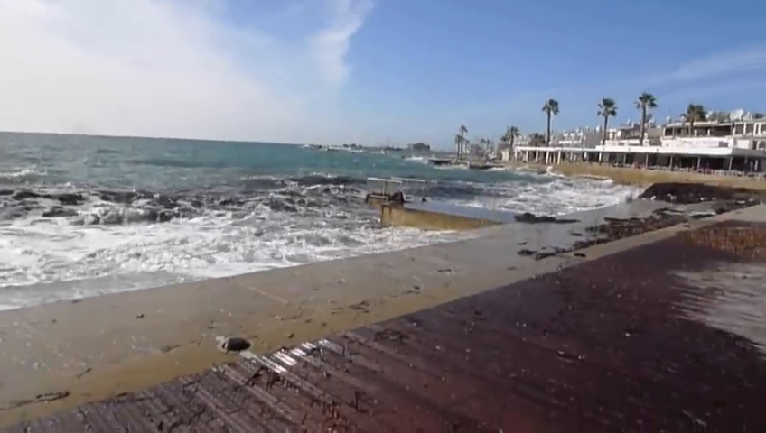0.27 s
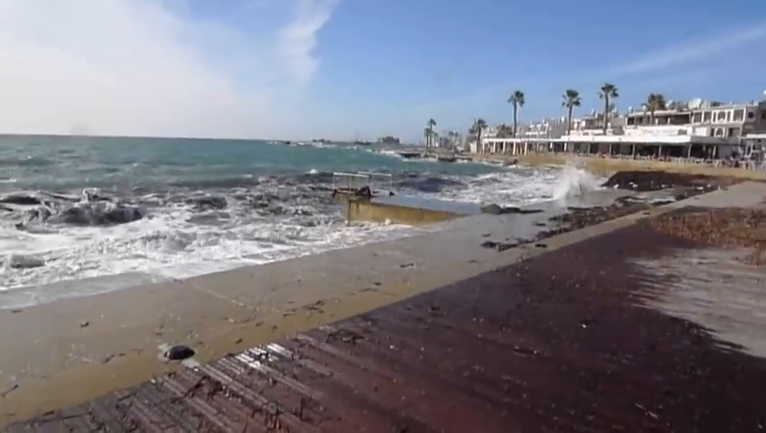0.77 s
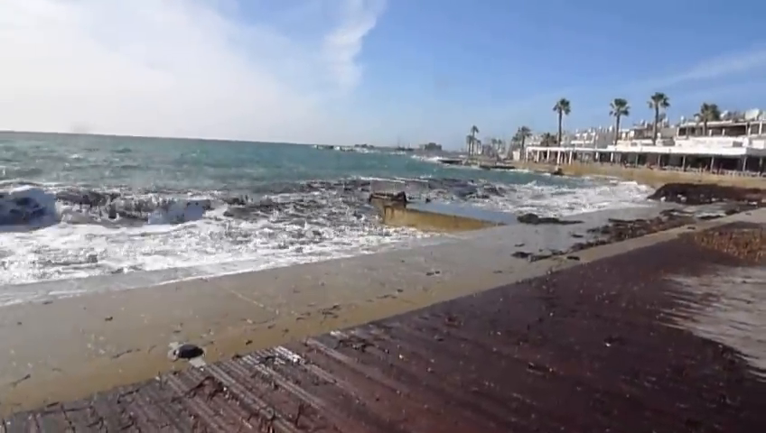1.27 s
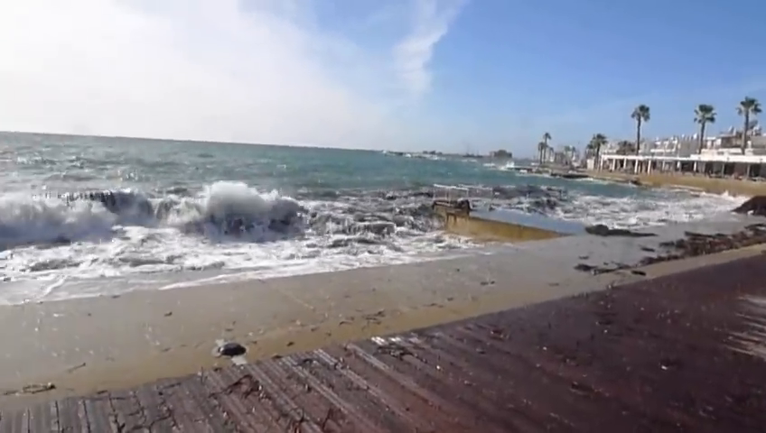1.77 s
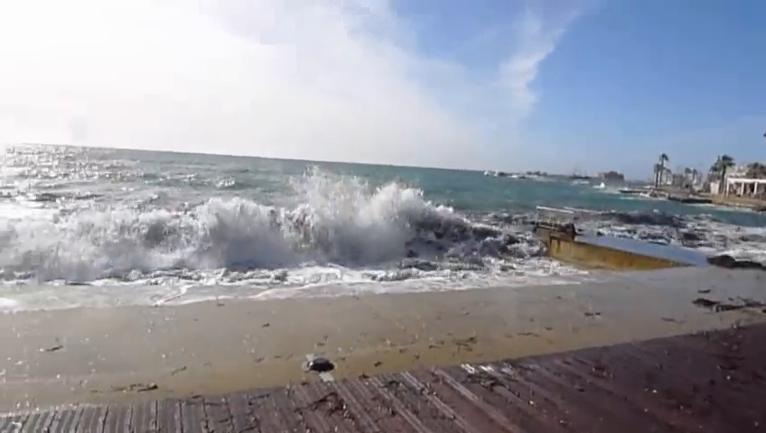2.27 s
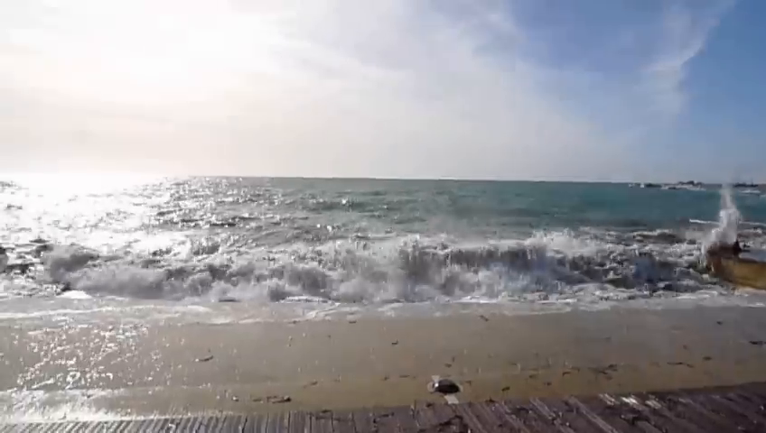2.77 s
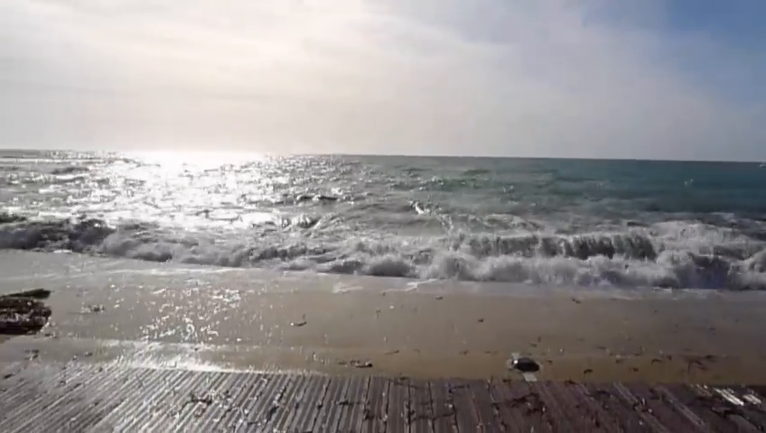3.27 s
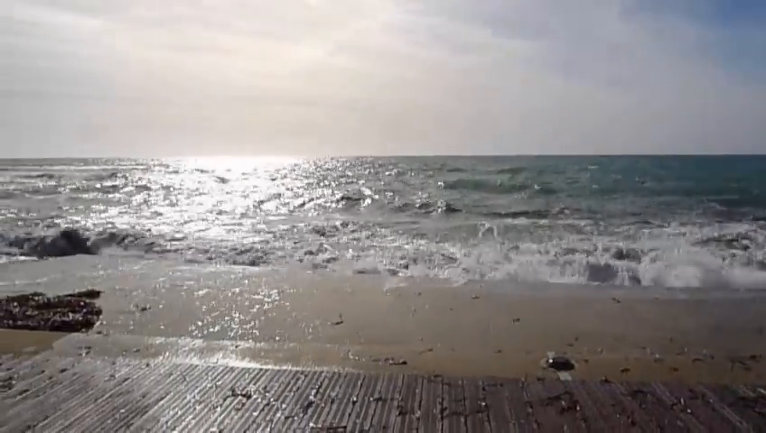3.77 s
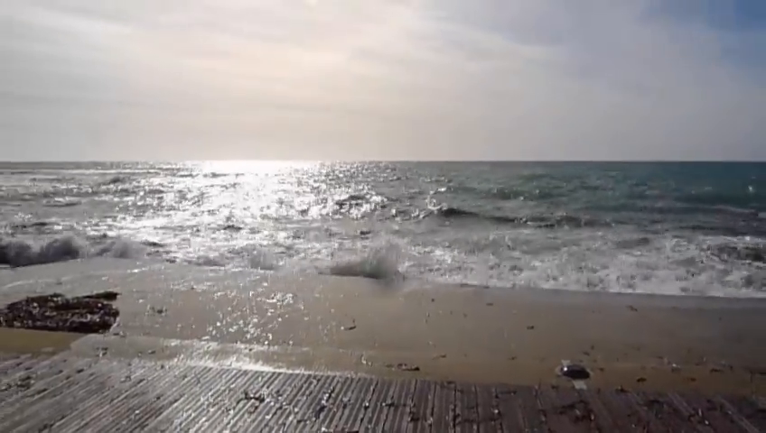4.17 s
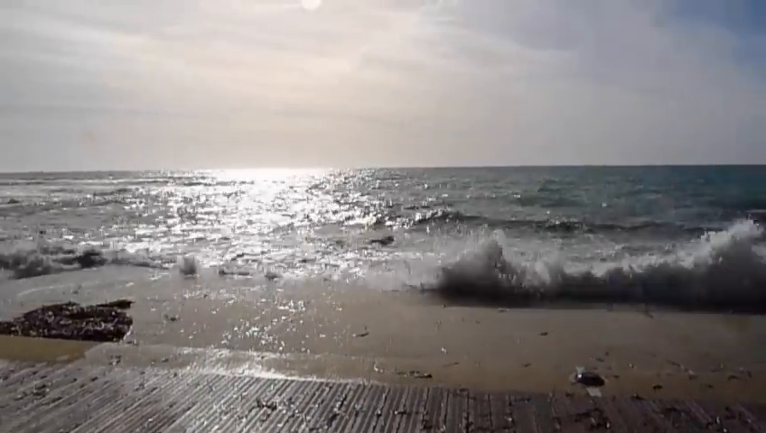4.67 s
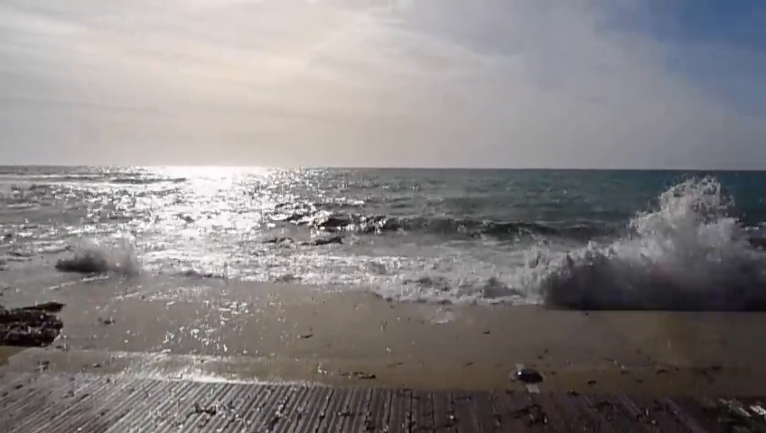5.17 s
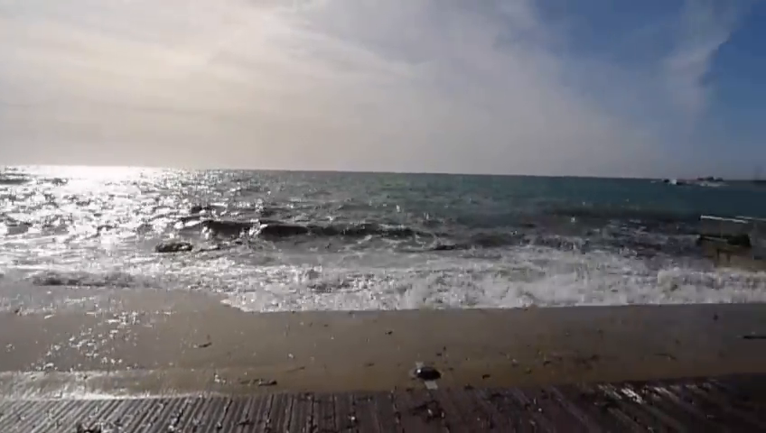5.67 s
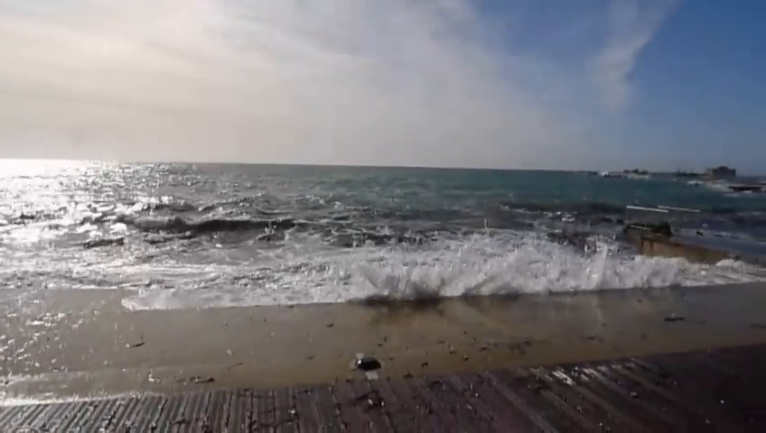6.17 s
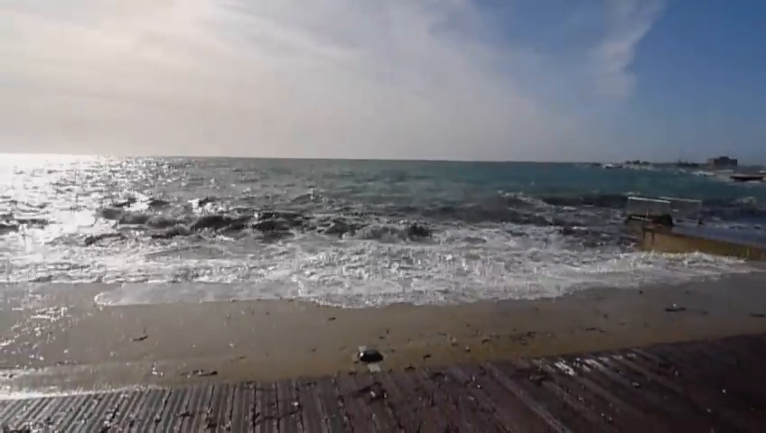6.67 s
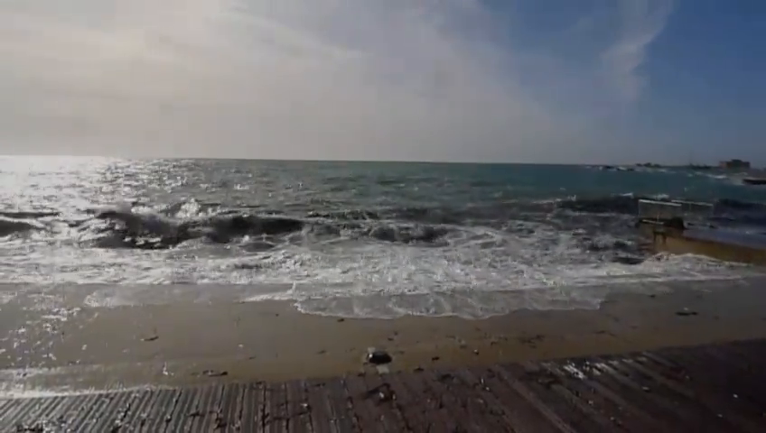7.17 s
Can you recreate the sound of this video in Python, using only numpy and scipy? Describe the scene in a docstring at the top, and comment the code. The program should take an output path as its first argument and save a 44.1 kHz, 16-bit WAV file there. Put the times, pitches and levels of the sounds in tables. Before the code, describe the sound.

Mono, slightly muffled sound from a small camera microphone on a windy concrete shore. At 0 s wind dominates: low fluttering rumble, irregular thuds and blunt pops, with the surf still faint behind. The roar of side breakers builds up to about 1.7 s, slapping at 0.5, 1.3 and 1.6 s. Hard gusts hit near 0.95, 1.3 and 1.7 s, then dense popping and flutter run to 2.6 s. Around 3 s the wind briefly smooths out and the surf is clearer; another cluster of pops batters from 3.3 to 3.9 s. From 4.2 s close wash and foam fizz come forward, with slaps near 4.9 and 5.3 s. Wind is steadier, with low heaves around 5.4 to 5.7 s. A splashy, crackling burst comes at 6.2 to 6.6 s, a short rattle of wind pops at 6.8 s, more thumps at 7.1 s, then receding wash and tiny rising bubble blips at 7.3 s.

```python
"""Concrete shore in strong wind: rough surf heard by a small camera microphone.
Side breakers and front wash are shaped noise, each combed by its echo off the wet slab.
Foam and lone bubbles are short rising rings. Gusts buffet the microphone port:
lumpy filtered noise for flutter, thud and rasp, single damped swings for pops and shoves."""
import sys
import numpy as np
from scipy import signal
from scipy.fft import rfft, irfft, next_fast_len
from scipy.io import wavfile
from scipy.ndimage import uniform_filter1d

SR = 44100
rng = np.random.default_rng(int(sys.argv[2]) if len(sys.argv) > 2 else 0)


def master(y):
    """Save y as 16-bit WAV."""
    cut = np.clip(np.atleast_2d(y).T, -1, 1)
    pcm = np.round(cut * 32767)  # scale
    wavfile.write(sys.argv[1], SR, pcm.astype(np.int16))


def volts_from_db(level):
    """Convert decibel levels to linear amplitude ratios."""
    exponent = np.asarray(level, float) / 20
    return 10 ** exponent


N = 327037

# run of the waves: t/s, roar level/dB, spray hiss over roar/dB, front wash against side breakers/0-1
SURF = [(0, -36, -5.5, 0.66), (.5, -31.5, -6.5, 0.28), (.9, -28, -7, 0.4), (1.3, -26.5, -6.5, 0.4),
        (1.65, -23.5, -7.5, 0.2), (1.95, -29, -5.5, 0.2), (2.12, -29, -4, .2), (2.3, -25.5, -5, 0.26),
        (2.55, -29, -4, 0.5), (2.7, -30, -3.5, 0.8), (2.95, -29, -4, 0.65), (3.25, -25.5, -6, 0.55),
        (3.55, -25.5, -5, 0.88), (3.85, -27.5, -6.5, 0.5), (4.05, -28.5, -6, 0.65), (4.22, -27, -6, 0.6),
        (4.4, -25, -6.5, 0.8), (4.75, -26, -4, 0.63), (5.1, -25.5, -3.5, 0.92), (5.5, -27.5, -5.5, 0.93),
        (6.1, -29.5, -5, 0.44), (6.33, -24.5, -6, 0.95), (6.46, -27, -4.5, 0.7), (6.6, -26, -4.5, 0.8),
        (7.15, -30.5, -6, 0.5), (7.42, -27.5, -6.5, 0.66)]
# wind pops, membrane sucked out: t of trough/s, nominal depth/dB, f/Hz
POPS = [(0.102, -9, 220), (0.236, -11, 243), (0.27, -10.5, 173), (0.511, -9, 173), (0.614, -10.5, 178),
        (0.626, -7.5, 129), (0.754, -15, 117), (0.944, -14, 224), (1.039, -9, 139), (1.262, -8.5, 191),
        (1.307, -11, 157), (1.388, -12, 141), (1.675, -9.5, 268), (1.706, -13.5, 121), (1.731, -10, 158),
        (1.805, -10, 232), (1.836, -6, 279), (1.92, -7.5, 290), (1.933, -6, 348), (1.955, -16, 107),
        (1.998, -16, 147), (2.017, -9, 202), (2.039, -5, 230), (2.124, -5.5, 286), (2.168, -6.5, 237),
        (2.258, -9, 259), (2.334, -6, 247), (2.388, -6.5, 190), (2.446, -12, 265), (2.475, -7, 236),
        (2.567, -9, 222), (2.593, -5.5, 231), (2.645, -14, 340), (3.255, -13, 200), (3.324, -7, 182),
        (3.343, -11.5, 245), (3.424, -12, 237), (3.541, -12, 279), (3.551, -7, 282), (3.563, -14, 324),
        (3.64, -8, 250), (3.698, -8, 250), (3.773, -5, 280), (3.794, -11, 237), (3.814, -14, 218),
        (3.835, -4.5, 253), (3.875, -12, 210), (4.447, -16, 272), (5.018, -14, 150), (5.287, -9, 225),
        (6.816, -10, 150), (6.826, -14, 150), (6.835, -10, 153), (6.844, -11, 132), (7.096, -13, 282),
        (7.114, -18, 147), (7.157, -19, 168), (7.408, -16, 158)]
# wind shoves, the other way: t of crest/s, nominal height/dB, f/Hz
SHOVES = [(.189, -10, 219), (.259, -11, 237), (.835, -10.5, 123), (0.943, -12, 315), (1.076, -8.5, 198),
          (1.135, -14, 262), (1.293, -12, 218), (1.302, -8, 221), (1.364, -9, 148), (1.425, -10.5, 150),
          (1.546, -12, 212), (1.694, -6, 306), (1.853, -7.5, 282), (1.895, -8.5, 315), (2.1, -10, 227),
          (2.254, -12, 262), (2.402, -11, 250), (2.418, -7, 190), (2.465, -9, 232), (3.577, -7, 222),
          (3.613, -6, 182), (3.622, -7, 246), (4.198, -11.5, 294), (4.87, -13, 163), (5.0, -9, 284),
          (5.269, -12, 195), (5.794, -12, 253), (6.028, -16, 240), (6.245, -12, 196), (6.846, -10.5, 152),
          (7.061, -15, 250), (7.116, -11.5, 202), (7.345, -13, 286)]


def evened(x):
    """Scales to rms 1."""
    return x / np.sqrt(np.mean(x ** 2) + 1e-20)


def read(points, hz):
    """Interpolates a spectrum table on a log frequency axis."""
    f, value = np.transpose(points)
    return np.interp(np.log(hz + 1), np.log(f + 1), value)


def columns(rows, t):
    """Interpolates every column of a time table at t."""
    s, *values = np.transpose(rows)
    return [np.interp(t, s, v) for v in values]


def coloured(x, points):
    """Filters by a spectrum table, zero phase."""
    size = next_fast_len(len(x))
    gain = volts_from_db(read(points, np.fft.rfftfreq(size, 1 / SR)))
    return irfft(rfft(x, size) * gain, size)[:len(x)]


def wander(seconds):
    """Smooth noise of rms 1 that changes over the given time."""
    size = max(round(seconds * SR), 2)
    once = uniform_filter1d(rng.standard_normal(N), size)
    return evened(uniform_filter1d(once, size))


def bumps(rows, t, fall_s):
    """Sum of bells in dB, each with its own rise time and a shared fall time."""
    return sum(db * np.exp(-((t - s) / np.where(t < s, rise_s, fall_s)) ** 2) for s, rise_s, db in rows)


def level_dips(t):
    """Surf loss in dB: the level drops quickly at listed times and recovers slowly."""
    # t/s, nominal depth/dB
    dips = [(0, 0.5), (.935, 6.5), (1.28, 3.5), (1.685, 6.5), (2.045, 5), (2.6, 3.5), (3.345, 1.5),
            (3.6, 3), (5.305, 0.5), (6.83, 1.5)]
    fall_s, return_s = 0.016, 0.48
    loss_db = 0
    for s, db in dips:
        since_s = np.maximum(t - s, 0)
        loss_db = loss_db + db * (1 - np.exp(-since_s / fall_s)) * np.exp(-since_s / return_s)
    return loss_db


def slab_comb(hz, delay_ms, strength, rough_hz):
    """Power response of direct sound plus slab echo; the rough slab scatters the echo's treble."""
    echo = (strength / (1 + (hz / rough_hz) ** 6))[:, None]
    return abs(1 + echo * np.exp(-2j * np.pi * hz[:, None] * delay_ms / 1e3)) ** 2


def surf():
    """Countless bursting bubbles: noise in drifting patches, combed by the slab echo."""
    # colour of the roar: f/Hz, spectral density/dB
    surf_colour = [(60, -32), (150, -12), (300, 4.5), (560, -6), (750, 0.66), (930, 1), (1200, -2.5),
                   (1550, -3), (2000, -4), (2500, -1.5), (3000, -3), (3400, -3), (3800, -9.5), (4300, -19),
                   (4800, -27), (5500, -31), (8000, -76)]
    # slaps of water: t of crest/s, level added to roar/dB, spray added/dB
    slaps = [(.52, 5.5, -2.5), (1.265, 3, -2.5), (1.545, 4, -4.5), (1.67, 2.5, 0), (2.33, -0.5, 0),
             (3.324, 2, 3), (4.24, 1, -0.5), (4.85, -1, 1.5), (5.14, -2, 4), (5.289, 6.5, -4),
             (6.21, -2, 6), (6.3, 0, 4), (6.335, 0.5, .1), (6.356, 2, 2), (6.372, 4.5, -3), (6.43, 2, 0),
             (6.455, 2.5, -1), (6.485, 6, -3.5), (6.52, 2, -0.5), (6.56, 1.5, 1.5), (7.29, 0.5, -.6)]
    # the breaking point moves along the shore: t/s, side echo delay as a share of its usual value
    side_reach = [(0, 1.01), (1.6, 1), (1.8, 1.03), (2.4, 1.03), (2.9, 1.06), (4, 1.01), (7.42, 1.04)]
    slap_rise_s, slap_fall_s = 0.021, 0.0053
    front_dull_hz = 4600  # the wet wash in front fades above this
    frames, hz = N // 128 + 5, np.fft.rfftfreq(512, 1 / SR)
    t = (np.arange(frames) * 128 / SR)[None]

    roar_db, bright_db, front = columns(SURF, t)
    front = np.clip(front, 0, 1)
    roar_db = roar_db - level_dips(t) + bumps([(s, slap_rise_s, db) for s, db, _ in slaps], t, slap_fall_s)
    bright_db = bright_db + bumps([(s, slap_rise_s, db) for s, _, db in slaps], t, slap_fall_s)

    real, imag, patches = rng.standard_normal((frames, 257, 3)).T
    patches = evened(uniform_filter1d(uniform_filter1d(patches, 6, 0), 20, 1))
    splashes = evened(uniform_filter1d(rng.standard_normal(frames), 8))  # land in all bands at once

    reach, = columns(side_reach, t)
    side = slab_comb(hz, 0.63 * reach, 0.75, 3300)
    near = slab_comb(hz, 1.34, 0.5, 3040) / (1 + (hz[:, None] / front_dull_hz) ** 6)
    shape = np.sqrt((1 - front) * side + front * near)
    shape = shape * volts_from_db(read(surf_colour, hz)[:, None])
    body = (hz > 650) & (hz < 1800)  # band that sets the level
    shape = shape / np.sqrt((shape[body] ** 2).sum(0))

    spray = np.clip(np.log((hz[:, None] + 1) / 1100) / np.log(2.6), 0, 1.4)  # takes over in the treble
    level_db = roar_db + spray * bright_db + 0.41 * patches + 0.41 * splashes
    z = (real + 1j * imag) * shape * volts_from_db(level_db)
    return signal.istft(z, nperseg=512, noverlap=384)[1][:N] * volts_from_db(1.5)  # overlap scaling


def foam():
    """Bubbles bursting at random in the front wash: short rising rings of 20 sizes, a few loud."""
    bursts_per_s, foam_db, spread_db = 600, -8.5, 4  # foam_db: over the roar at full front share
    low_hz, high_hz, tilt_db = 706, 2360, -3.5  # starting pitches; tilt from largest to smallest
    decay_cycles, glide = 4.5, 0.03
    t = np.arange(N) / SR
    roar_db, _, front = columns(SURF, t)
    strength_db = spread_db * np.minimum(rng.exponential(1, N), 4)
    burst = volts_from_db(strength_db) * (rng.random(N) < bursts_per_s / SR)
    kind, out = rng.integers(0, 20, N), np.zeros(N)
    for k, small in enumerate(np.linspace(0, 1, 20)):
        turns = np.arange(800) * low_hz * (high_hz / low_hz) ** small / SR
        envelope = (1 - np.exp(-turns ** 2)) * np.exp(-3 * turns / decay_cycles)
        ring = -np.sin(2 * np.pi * turns * (1 + glide * turns)) * envelope
        out += signal.oaconvolve(burst * (kind == k), volts_from_db(tilt_db * small) * ring)[:N]
    return evened(out) * np.clip(front, 0, 1) * volts_from_db(roar_db - level_dips(t) + foam_db)


def bubbles():
    """A pocket of air in the backwash rings briefly, its pitch rising as it nears the surface."""
    # t/s, length/s, starting f/Hz, peak level/dB
    lone_bubbles = [(7.268, 0.03, 2110, -28.5), (7.277, .02, 1960, -34), (7.289, 0.066, 1250, -28),
                    (7.32, .028, 2140, -35)]
    glide = 0.03  # share of pitch gained over the length
    out = np.zeros(N + SR)
    for s, length_s, hz, db in lone_bubbles:
        u = np.arange(max(round(length_s * SR), 2)) / (length_s * SR)
        phase = 2 * np.pi * np.cumsum(hz * (1 + glide * u)) / SR
        out[round(s * SR):][:len(u)] += volts_from_db(db) * np.sin(phase) * np.sin(np.pi * u) ** 2
    return out[:N]


def wind():
    """Eddies push the membrane in lumps: small ones flutter, large ones thud, hard ones rasp."""
    # t/s, flutter level/dB, thud level/dB, gustiness/0-1, share of quick eddies/0-1
    wind_run = [(0, -21.5, -29, 0.9, 0), (.25, -25, -33.5, .95, 0.05), (.4, -27, -24.5, 1, 0.2),
                (.62, -22, -24, 0.7, 0.1), (.85, -24, -18.5, 1, 0.4), (1.1, -26, -26.5, 1, .2),
                (1.35, -26.5, -24, 0.7, 0.6), (1.55, -27, -25.5, 0.8, 0.9), (1.75, -25.5, -26, 1, 0.9),
                (2.1, -23, -29.5, 0.9, 0.2), (2.48, -20.5, -34, 1, 0.1), (2.65, -28, -36, 0.9, 0.6),
                (3.0, -27, -40.5, 0.2, 0.3), (3.3, -22, -37, 0.4, 0.6), (3.8, -21.5, -35, 0.7, 0),
                (4.0, -27, -37.5, 0.8, 0.93), (4.5, -22, -36, 0.3, 0.4), (4.95, -22.5, -34, 0.1, 0.9),
                (5.45, -24.5, -43, .3, 0.9), (6.1, -25, -34.5, 0.2, 0.6), (6.75, -25, -32, 0.2, 0.8),
                (7.42, -29, -36.5, 0.03, 0.7)]
    # gusts build up and break off, negative = lull: t of peak/s, build-up/s, flutter added/dB
    gusts = [(.12, 0.085, 1), (.21, .07, 1.5), (.27, 0.05, 6.5), (.62, 0.045, -1), (.72, 0.032, 3.5),
             (.945, 0.029, 9), (.98, 0.026, -10), (1.27, 0.036, 3.5), (1.31, .03, 11), (1.39, .05, 2.5),
             (1.53, 0.095, 2), (1.58, 0.026, 0.5), (1.695, 0.07, 11.5), (1.735, .025, 7.5), (1.76, 0.03, 0),
             (1.85, 0.044, 7.5), (1.92, 0.054, 5.5), (2.04, 0.054, 3), (2.07, 0.033, -4.5), (2.13, .05, 6),
             (2.25, 0.048, 3.5), (2.33, 0.047, 2.5), (2.55, 0.015, -12), (2.6, 0.044, 3.5),
             (2.68, 0.037, 2.5), (2.74, 0.021, -1.5), (3.08, 0.022, -0.5), (3.24, 0.037, 2.5),
             (3.55, 0.034, 6.5), (3.625, 0.023, 4), (3.68, 0.039, -4.5), (3.78, 0.033, 4.5),
             (3.85, 0.037, 1), (4.12, 0.016, 3.5), (4.25, 0.06, 3), (4.5, 0.18, 3), (6.03, .03, 2),
             (6.08, .04, -1.5), (7.16, 0.028, 1.5)]
    # same for large eddies: t of peak/s, build-up/s, thud added/dB
    heaves = [(.27, 0.065, 5), (.99, 0.032, -9), (1.27, 0.065, 3), (1.69, 0.092, 2.5), (1.82, 0.063, -11),
              (1.89, 0.045, 4), (2.31, 0.045, -14), (2.4, .06, 7.5), (5.3, 0.16, 2.5), (5.41, 0.035, 6.5),
              (5.7, 0.046, 13), (6.54, 0.054, -13), (6.67, 0.07, 0.5), (6.76, 0.046, -6), (6.83, 0.044, 10),
              (7.0, 0.074, -2), (7.1, 0.064, 7)]
    # colour of quick small eddies: f/Hz, spectral density/dB
    flutter_colour = [(60, -30.5), (110, -15), (170, -1.5), (260, -0.5), (370, -3.5), (520, -9.5),
                      (800, -20), (1500, -38), (3000, -86.5)]
    # colour of large eddies: f/Hz, spectral density/dB
    thud_colour = [(10, -36), (28, -23.5), (45, -6.5), (70, 1), (110, 2.5), (150, 1), (250, -46.5),
                   (600, -90.5)]
    # colour of the sharp edge of the hardest buffets: f/Hz, spectral density/dB
    rasp_colour = [(250, -20), (450, -2.5), (650, -1.5), (900, -5.5), (1400, -30)]
    gust_break_s, heave_break_s = 0.012, 0.032
    dip_db, dip_s = -4.5, 0.0054  # flutter and thud dip briefly around each pop or shove
    rasp_db, rasp_lumps = -22, 0.54  # over the flutter at full gustiness; extra lumpiness
    t = np.arange(N) / SR

    flutter_db, thud_db, gusty, quick = columns(wind_run, t)
    quick = np.clip(quick, 0, 1)
    dips_db = bumps([(s, dip_s, dip_db) for s, *_ in POPS + SHOVES], t, dip_s)
    flutter_db = flutter_db + bumps(gusts, t, gust_break_s) + dips_db
    thud_db = thud_db + bumps(heaves, t, heave_break_s) + dips_db

    lumps_db = gusty * (2.9 * wander(0.005) + 0.28 * wander(0.014))
    push = rng.standard_normal(N) * volts_from_db(lumps_db)
    lazy_colour = [(hz * 0.75, db) for hz, db in flutter_colour]  # lazier eddies flutter lower
    lively = evened(coloured(push, flutter_colour))
    lazy = evened(coloured(push, lazy_colour))
    flutter = evened(quick * lively + (1 - quick) * lazy)
    thud = evened(coloured(rng.standard_normal(N) * volts_from_db(0.37 * lumps_db), thud_colour))
    rasp = evened(coloured(push * volts_from_db(rasp_lumps * lumps_db), rasp_colour + [(3000, -90)]))
    rasp = rasp * gusty * volts_from_db(rasp_db)
    return (flutter + rasp) * volts_from_db(flutter_db) + thud * volts_from_db(thud_db)


def pops():
    """A lone eddy sucks the membrane out, or shoves it in, and it rebounds."""
    spread_turns, rebound_turns = 0.56, 0.11  # width of the swing; its lean to the rebound
    out = np.zeros(N + SR)
    for way, rows in ((-1.01, POPS), (0.89, SHOVES)):
        for s, db, hz in rows:
            reach = round(2 * SR / hz)
            turns = np.arange(-reach, reach) * hz / SR
            envelope = np.exp(-((turns - rebound_turns) / spread_turns) ** 2)
            swing = way * np.cos(2 * np.pi * turns) * envelope
            swing = swing - swing.mean() * 2 * np.hanning(2 * reach)  # no net push
            out[round(s * SR) - reach:][:2 * reach] += volts_from_db(db) * swing
    return out[:N]


def electronics():
    """White converter hiss plus faint tones whose pitches drift together."""
    # f/Hz, level/dB rms
    whines = [(4388, -78), (6223, -86), (6665, -87), (7584, -89)]
    hiss_db, waver = -59.5, 0.0006  # hiss before band limiting; rms pitch drift as a share
    hiss = volts_from_db(hiss_db) * rng.standard_normal(N)
    clock_s = np.cumsum(1 + waver * wander(0.045)) / SR
    tones = sum(volts_from_db(db) * np.sqrt(2) * np.sin(2 * np.pi * hz * clock_s) for hz, db in whines)
    return hiss + tones


def scene():
    """Sums water and wind into one channel."""
    return (surf() + foam() + bubbles() + wind() + pops())[None]


def low_pass(x):
    """Removes everything above the highest recorded frequency."""
    return signal.sosfilt(signal.butter(12, 8250, fs=SR, output="sos"), x)


def record(dry):
    """Soft limit on peaks, treble roll-off, added electronics noise, band edge and steady offset."""
    ceiling, roll_off_hz, edge_hz, offset = 0.49, 5260, 8010, -0.0077
    limited = ceiling * np.tanh(dry / ceiling)
    roll_off = signal.butter(4, roll_off_hz, fs=SR, output="sos")
    dulled = signal.sosfilt(roll_off, limited)
    edge = signal.firwin(401, edge_hz, window=("kaiser", 10), fs=SR)
    mix = signal.oaconvolve(dulled + electronics(), edge[None], "same") + offset
    return low_pass(mix)


dry = scene()
out = record(dry)
master(out)
```